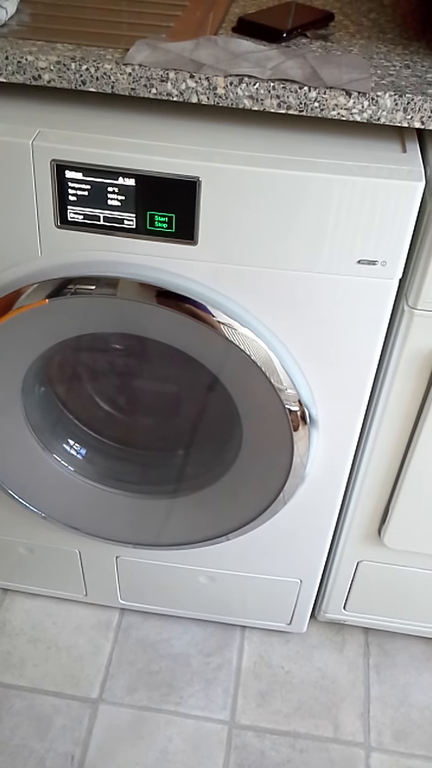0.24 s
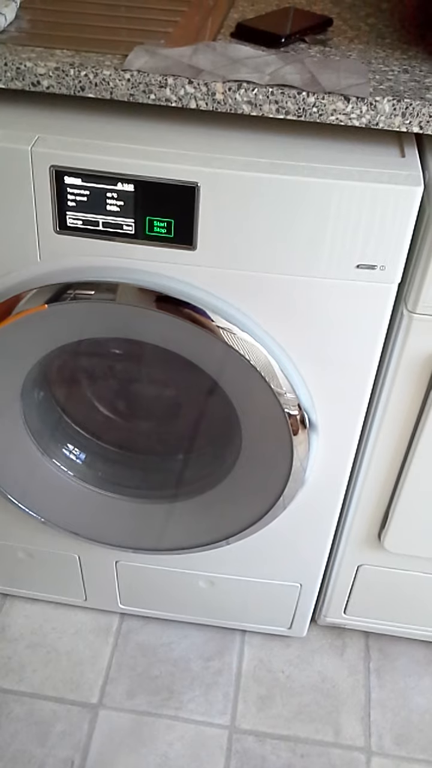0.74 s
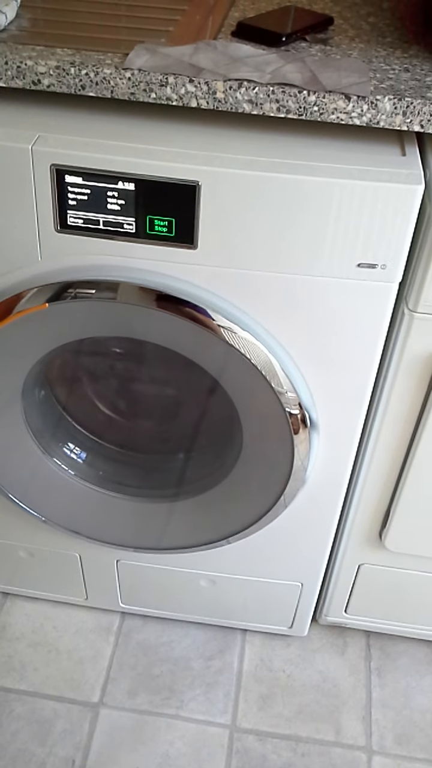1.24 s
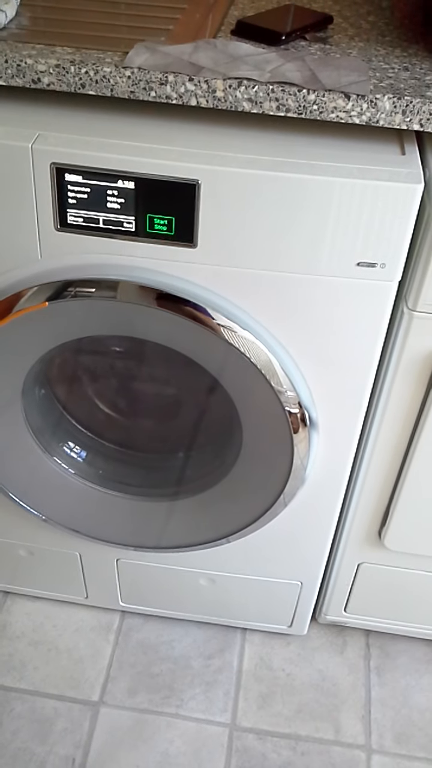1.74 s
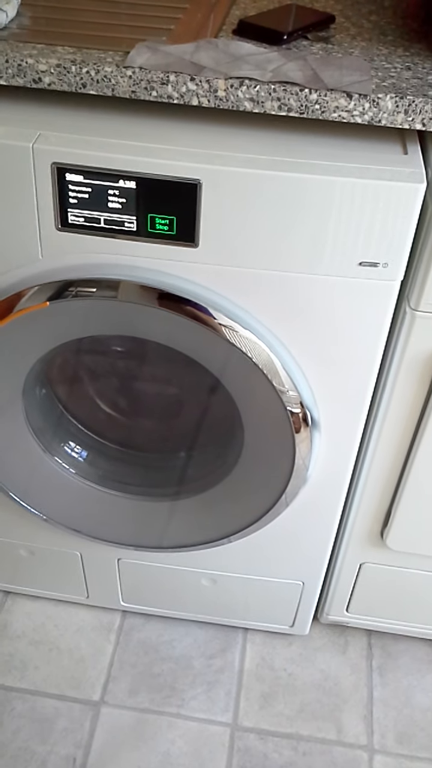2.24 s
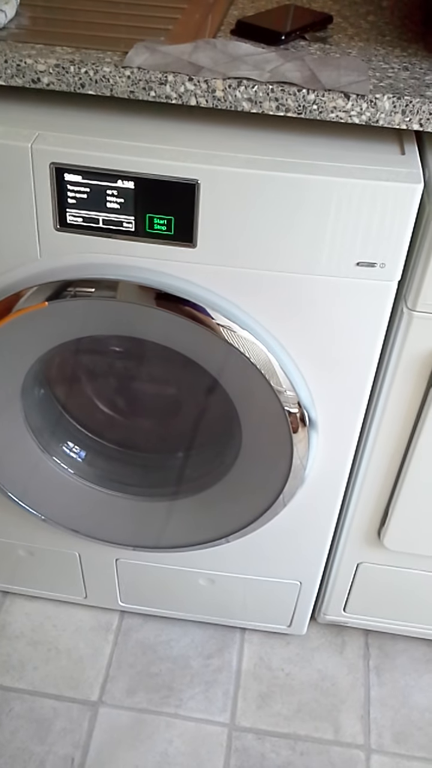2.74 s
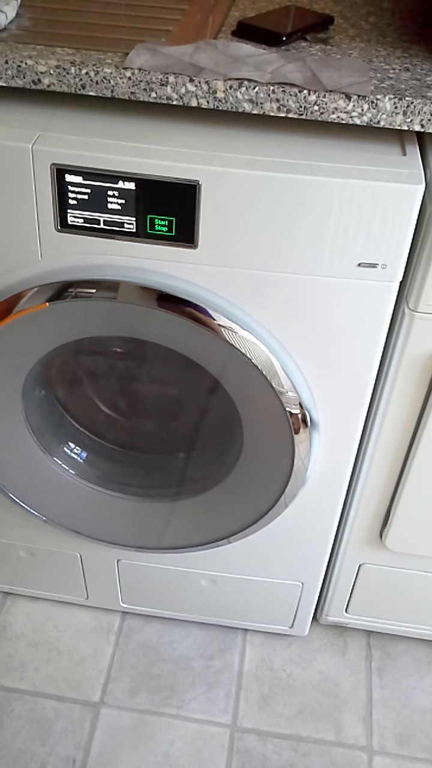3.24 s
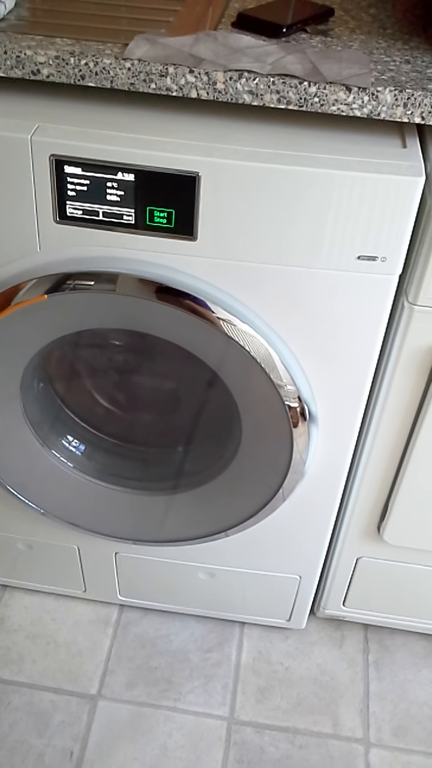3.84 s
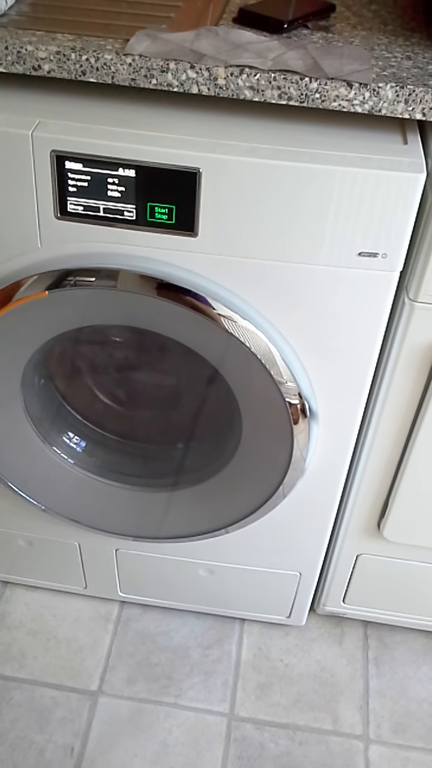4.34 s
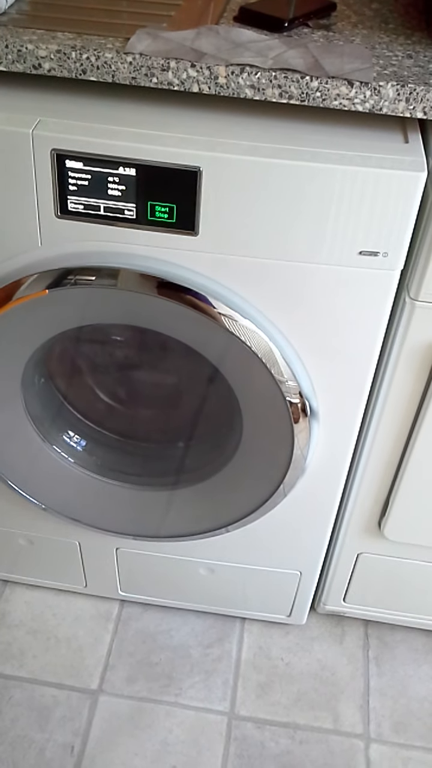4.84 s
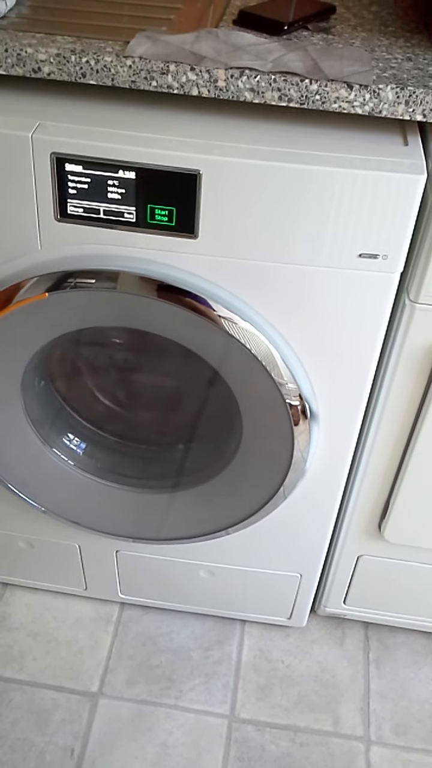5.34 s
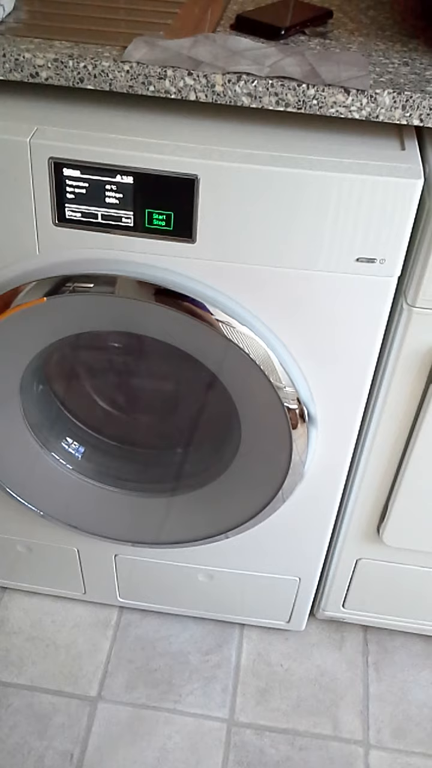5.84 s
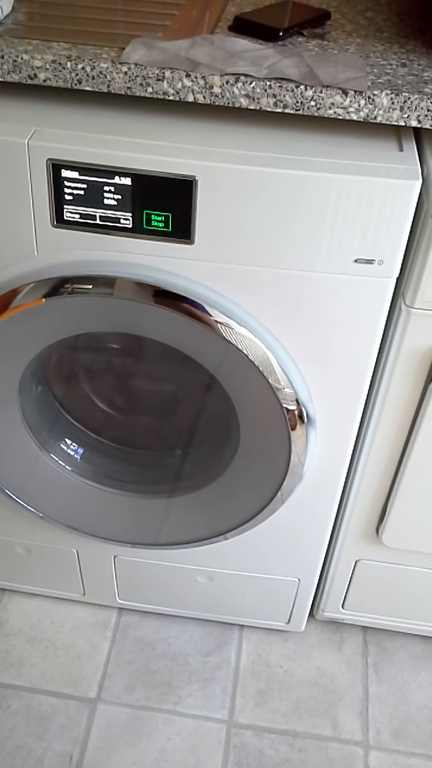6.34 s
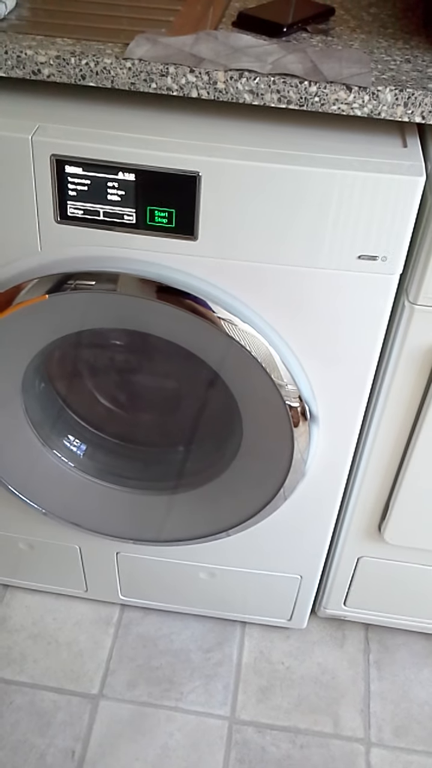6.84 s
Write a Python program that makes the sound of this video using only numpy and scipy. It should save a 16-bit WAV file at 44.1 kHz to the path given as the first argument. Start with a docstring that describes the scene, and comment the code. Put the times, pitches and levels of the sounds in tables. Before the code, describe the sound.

Continuous loud mechanical clatter from a spinning front-loader, picked up close by a single phone microphone in a small reflective kitchen. Very fast metal ticks and dead knocks fuse into a buzzing, piercing whine, gently swelling about three times a second as the tub rocks. Below are a buzzing drum hum, wavering motor tones, uneven low panel booms and steady airy hiss. It neither starts nor stops.

```python
"""A fast metallic knocking that blurs into a whine: a front-loading washing machine at full spin in a tiled kitchen.
A loose part knocks several times every drum turn; decaying sines and shaped noise let the cabinet and room ring on
from tick to tick. Under it the unbalanced drum hums in sines at multiples of its rate, with wandering motor tones.
Filtered noise makes the floor rumble, an uneven panel boom and the rushing air; one phone microphone hears it all."""
import sys
import numpy as np
from scipy import signal
from scipy.fft import rfft, irfft, next_fast_len
from scipy.io import wavfile
from scipy.ndimage import uniform_filter1d, minimum_filter1d, map_coordinates

SR = 44100
rng = np.random.default_rng(int(sys.argv[2]) if len(sys.argv) > 2 else 0)


def waveform_to_disk(signal):
    """Save audio, clipped to [-1, 1], as 16-bit WAV at the path in sys.argv[1]."""
    frames = np.transpose(np.atleast_2d(signal))
    scaled = np.clip(frames, -1, 1) * 32767
    samples = np.round(scaled).astype(np.int16)
    wavfile.write(sys.argv[1], SR, samples)


N = 313110

DRUM_HZ = 26.915  # turns a second
ROCK_HZ = 3.165  # the tub rocks on its springs

# Dense ringing of panels and walls, also the colour of the clicks: pitch_hz, relative level_db per Hz
PANEL_COLOUR = [(500, -37), (1200, -24), (1450, -22), (1750, -13), (2050, -1.5), (2600, -14.5),
                (3250, -6.5), (3410, -14), (3600, -5), (3830, -6.5), (4200, 0), (4900, -8), (5400, -4.5),
                (5800, -12), (6200, -8), (6800, -17.5), (7400, -12), (7900, -20), (8400, -15),
                (9400, -17.5), (10200, -30), (11500, -18.5), (12200, -39), (14000, -64)]


def amp(db):
    """Gain of a level in dB."""
    return 10 ** (np.asarray(db) / 20)


def unit(x):
    """x at rms 1."""
    return x / np.sqrt(np.mean(x ** 2) + 1e-20)


def along(points, hz):
    """Reads a curve of (Hz, value) points on a log frequency axis."""
    f, v = np.transpose(points)
    return np.interp(np.log(hz + 1), np.log(f + 1), v)


def wobble(rate):
    """A smooth random curve, rate knots a second."""
    knots = rng.standard_normal(int(N * rate / SR) + 4)
    return map_coordinates(knots, [np.arange(N) * rate / SR])


def filtered(x, response):
    """x shaped by a gain that depends on frequency."""
    m = next_fast_len(len(x) + SR // 2)
    return irfft(rfft(x, m) * response(np.fft.rfftfreq(m, 1 / SR)), m)[:len(x)]


def noise(spectrum):
    """Coloured noise of rms 1."""
    return unit(filtered(rng.standard_normal(N), lambda hz: amp(along(spectrum, hz))))


def sway(t):
    """Seconds by which the rocking tub, and its slower second motion, delay the drum's round."""
    rock_us, rock_start_s = 151, .0897  # peak lateness; a rising zero
    roll_hz, roll_us, roll_start_s = 2.11, 51, .0839
    rock = rock_us * np.sin(2 * np.pi * ROCK_HZ * (t - rock_start_s))
    roll = roll_us * np.sin(2 * np.pi * roll_hz * (t - roll_start_s))
    return 1e-6 * (rock + roll)


def ticks(lead):
    """One blow per turn, placed between samples; starts early, so the ringing is already full."""
    first_tick_s = .0082
    drift_us, scatter_us = 39, 34  # slow irregular lateness; random lateness of each tick
    size_scatter_db, rock_swell_db = .5, .25  # blows differ at random and with the rocking
    t = first_tick_s + np.arange(-12, int(N / SR * DRUM_HZ)) / DRUM_HZ
    chance = rng.standard_normal((len(t), 2))
    drift = np.interp(t, np.arange(N) / SR, wobble(14))
    late_us = drift_us * drift + scatter_us * chance[:, 0]
    at = (t + sway(t) + 1e-6 * late_us) * SR + lead
    rocking = np.sin(2 * np.pi * (ROCK_HZ * t + 0.5))
    size = amp(size_scatter_db * chance[:, 1] + rock_swell_db * rocking)
    # a windowed sinc carries each blow to its exact fraction of a sample
    index = np.round(at).astype(int)[:, None] + np.arange(-16, 17)
    off = index - at[:, None]
    pulse = size[:, None] * np.sinc(off) * np.cos(np.pi * off / 34) ** 2
    return np.bincount(index.ravel(), pulse.ravel(), N + lead + 64)[:N + lead]


def chatter(t):
    """The struck part chatters: bright noise clicks of the blow and its rebounds, each dying fast."""
    # Rebounds: start_s after the blow, relative level_db
    rebounds = [(0, -30), (.0025, -37), (.0105, -49), (0.0157, -19), (.0205, -40), (.0285, -42)]
    click_t60_s, click_above_hz = 0.0063, 5500
    shape = sum(amp(db - 60 * np.maximum(t - s, 0) / click_t60_s) * (t >= s) for s, db in rebounds)

    def colour(hz):
        tilt = amp(along(PANEL_COLOUR, hz) - along(PANEL_COLOUR, 6200))
        return tilt / (1 + (click_above_hz / (hz + 1)) ** 8)

    return filtered(shape * rng.standard_normal(len(t)), colour)


def cabinet_modes(t):
    """Strong modes of the steel cabinet: decaying sines, each rung by one of the contacts in a turn."""
    # Modes: pitch_hz, relative level_db, t60_s, contact (number from 0)
    modes = [(946.5, -41.5, 0.18, 0), (975.5, -45.5, 0.31, 0), (1004.3, -40.5, 0.16, 0),
             (1050, -34, 0.19, 0), (1078.5, -42.5, 0.28, 0), (1130, -40.5, 0.24, 0), (1158, -42, 0.35, 0),
             (1192, -42, 0.34, 1), (1265, -52, 0.12, 0), (1394.5, -44, .75, 0), (1415.6, -45, 0.4, 1),
             (1607, -40.5, 0.29, 2), (1619, -46, 0.32, 2), (1700, -50, 0.27, 0), (1723, -43, 0.31, 0),
             (1743, -44, 0.16, 0), (1805, -43, 0.24, 1), (1860, -42, 0.2, 0), (1886, -30.5, 0.17, 0),
             (1916, -32, 0.16, 0), (1938, -31, 0.14, 0), (1958, -35.5, 0.15, 0), (2045, -35.5, 0.34, 1),
             (2100, -34, 0.13, 2), (2116, -35.5, 0.24, 0), (2176, -29.5, 0.26, 1), (2261, -25.5, 0.17, 2),
             (2296, -34.5, 0.27, 0), (2330, -56, 0.17, 1), (2400, -36, 0.18, 1), (2420, -41, 0.11, 1),
             (2733, -37.5, 0.17, 0), (2795, -32, 0.24, 0), (2850, -37, 0.22, 0), (2910, -26, 0.15, 0),
             (3030, -35, 0.12, 2), (3110, -32.5, 0.18, 2), (3332, -27.5, 0.29, 1), (3568, -33, 0.14, 0),
             (2931, -31, 0.18, 0), (3142, -33.5, 0.19, 2), (3218, -28.5, 0.25, 1), (3284, -31, 0.24, 0),
             (3367, -23, 0.11, 0), (3490, -30.5, 0.27, 0), (3528, -30.5, 0.34, 0), (3573, -36, 0.34, 0),
             (3655, -32, 0.42, 0), (3650, -40, 0.26, 1), (3734, -30.5, .22, 1), (3920, -33.5, 0.34, 1),
             (3950, -34, 0.28, 2), (4047, -29, 0.13, 2), (4073, -31, .3, 0), (4110, -36, .25, 2),
             (4144, -25, .3, 2), (4133, -22.5, .28, 1), (4153, -23.5, .28, 1), (4188, -35, .28, 0),
             (4215, -27.5, .28, 2), (4294, -28, .28, 1), (4355, -33, .28, 2), (4380, -29.5, .28, 0),
             (4402, -31, .28, 1), (4432, -30, .28, 2), (4510, -35, 0.22, 2), (4700, -47, 0.18, 1),
             (4550, -33, 0.17, 2), (4630, -49, .2, 2), (4712, -30, 0.1, 1), (4805, -27, 0.13, 1),
             (5190, -41, .2, 0), (5175, -37, 0.33, 1), (5275, -42, 0.47, 0), (5378, -31.5, 0.24, 0),
             (5437, -33, 0.23, 0), (5490, -38, 0.2, 1), (5270, -42, .28, 2), (5620, -28, 0.077, 0),
             (6149, -39, 0.11, 0), (6305, -31.5, 0.063, 0), (7270, -27.5, 0.09, 0)]
    # Contacts in a turn: start_s after the first
    contacts = [0, .0135, .0285]
    attack_s = 0.0041
    since = [np.maximum(t - s, 0) for s in contacts]

    def ring(u, hz, db, t60):
        build_up = 1 - np.exp(-u / attack_s)
        return amp(db - 60 * u / t60) * np.sin(2 * np.pi * hz * u) * build_up

    return sum(ring(since[round(k)], hz, db, t60) for hz, db, t60, k in modes)


def panel_wash(t):
    """Dense ringing of panels and room: noise that dies by band, evened out and coloured."""
    # Decay of the wash: pitch_hz, t60_s
    wash_t60 = [(700, 0.33), (2000, 0.81), (4000, 0.97), (8000, 0.11)]
    even_hz = 70  # so dense that no band this wide stands out by chance
    hz, frames, z = signal.stft(rng.standard_normal(len(t)), SR, nperseg=256)
    late = np.maximum(frames - .025, 0)  # the panels feed the room for a while before the decay sets in
    z = z * amp(-60 * late / along(wash_t60, hz)[:, None])
    dying = rfft(signal.istft(z, SR, nperseg=256)[1][:len(t)])
    local = uniform_filter1d(np.abs(dying) ** 2, round(even_hz * len(t) / SR))
    even = dying / np.sqrt(np.abs(local) + 1e-20)
    colour = amp(along(PANEL_COLOUR, np.fft.rfftfreq(len(t), 1 / SR)))
    return irfft(even * colour, len(t))


def ringing():
    """What one turn sets off: cabinet modes in a dense wash that builds up and dies, plus bright clicks."""
    t = np.arange(SR // 2) / SR
    fade = np.clip((t[-1] - t) / .05, 0, 1)
    modes = cabinet_modes(t) * fade
    wash = amp(-34.5) * unit(panel_wash(t) * fade) * (1 - np.exp(-t / 0.0042))
    return modes + wash + chatter(t)


def knocks(train, lead):
    """Short dead knocks inside each turn: rising, quickly damped sines that swell at the tub's rocking rate."""
    # Knocks: start_s after the first contact, pitch_hz at onset, relative level_db, t60_s,
    # swell_db, moment of the swell (share of one rock)
    thuds = [(.0005, 2100, -15.5, .022, 1.5, .5), (.0005, 4630, -15, 0.024, 4, 0.23),
             (.0002, 5405, -16.5, .03, 1.5, 0.96), (.0003, 8150, -24, .03, 2.5, .8),
             (.0003, 7500, -25.5, 0.026, 0.5, .8), (.002, 1112, -26, 0.032, 1, .94),
             (.002, 3574, -16, 0.025, 3, 0.28), (.0028, 6184, -21.5, 0.024, -0.5, 0.73),
             (.006, 3050, -18, 0.024, 4.5, .3), (.0085, 4595, -17.5, 0.027, 4.5, .3),
             (.009, 3630, -14, 0.023, 4, 0.35), (.009, 6170, -22, 0.04, 0.5, .8),
             (0.0136, 4143, -14, 0.081, 2, 0.82), (.017, 1954, -15.5, .025, 2, 0.65),
             (.0175, 4280, -20, .03, 1, 1), (.017, 2985, -18, 0.037, 1.5, .3),
             (0.0176, 7600, -25, 0.022, 1.5, .8), (.022, 5400, -16, .022, 1, .9),
             (0.0303, 4150, -13, 0.04, 2.5, .8), (0.0297, 6030, -25, 0.028, 3, .8)]
    attack_s, rise = 0.0015, 0.95  # build-up; pitch climbs by twice this share a second
    uneven_db, own_db = 1.1, 2  # harder or softer together, and each on its own
    t, u = np.arange(N) / SR, np.arange(SR // 10) / SR
    total = np.zeros(N)
    for s, hz, db, t60, swell_db, moment in thuds:
        v = np.maximum(u - s, 0)
        envelope = amp(db - 60 * v / t60) * (1 - np.exp(-v / attack_s))
        thud = envelope * np.sin(2 * np.pi * hz * v * (1 + rise * v))
        rocking = np.cos(2 * np.pi * (ROCK_HZ * t - moment))
        weight_db = swell_db * rocking + own_db * wobble(20)
        total += amp(weight_db) * signal.oaconvolve(train, thud)[lead:lead + N]
    return amp(uneven_db * wobble(16)) * total


def rattle():
    """Every blow of the loose part sets off the ringing of cabinet and kitchen, and the dead knocks."""
    lead = SR // 2
    train = ticks(lead)
    ring = signal.fftconvolve(train, ringing())[lead:lead + N]
    return amp(2.5) * ring + knocks(train, lead)


def hum():
    """The unbalanced drum's orders: sines that follow the rocking, each swelling a little on its own."""
    # Drum orders: multiple of the drum rate, relative level_db
    orders = [(1, -11), (2, -27), (3, -11), (4, -6), (5, -5.5), (6, -5.5), (7, -10.5), (8, -13), (9, 0),
              (10, -20), (11, -13), (12, -12), (13, -19), (14, -7.5), (15, -12), (16, -19), (17, -24),
              (18, -20), (19, -24), (20, -11), (21, -23), (22, -12), (23, -37), (24, -29), (25, -13),
              (26, -13), (27, -9), (28, -16.5), (29, -9.5), (30, -13.5), (31, -15.5), (32, -33), (33, -24),
              (34, -17), (37, -25)]
    t = np.arange(N) / SR
    angle = DRUM_HZ * (t - sway(t))  # turns
    return sum(amp(db - 36 + 1.2 * wobble(3.135)) * np.sin(2 * np.pi * (k * angle + rng.random()))
               for k, db in orders)


def motor():
    """Tones that do not lock to the drum and waver in pitch and level."""
    # Wavering tones: pitch_hz, level_db (rms, before wavering), wander_hz
    tones = [(291.4, -44, 1.2), (325.2, -44, 1.49), (406, -50.5, 3.79), (436, -50.5, 2.95),
             (474, -56, 2.94), (576, -53.5, 2.11)]

    def tone(hz, wander):
        turns = np.cumsum(hz + wander * wobble(6)) / SR
        return np.sqrt(2) * np.sin(2 * np.pi * turns)

    return sum(amp(db + 2.3 * wobble(5.5)) * tone(hz, wander) for hz, db, wander in tones)


def rumble():
    """Shaking passed to the floor: low coloured noise of uneven level."""
    # Floor noise: pitch_hz, relative level_db per Hz
    floor_colour = [(20, -16), (60, -11), (100, -1.5), (145, -1.5), (200, 3), (262, -3), (330, -1),
                    (450, -5.5), (600, -6.5), (1000, -9), (1600, -45)]
    return amp(-35.0 + 1.1 * wobble(4.9)) * noise(floor_colour)


def boom():
    """A low panel booms unevenly: resonant noise, with short sine bursts where it swells."""
    # Strongest swells: centre_s, level_db (rms, at the centre)
    bursts = [(0.3, -34), (0.73, -36), (1.34, -33), (2.13, -32), (3.61, -30.5), (4.09, -31), (4.78, -38),
              (5.5, -28), (5.92, -34), (6.43, -31), (6.97, -35)]
    panel_hz, panel_width_hz = 214.8, 16
    boom_db, uneven_db = -45.5, 4.5
    swell_s = 0.023  # half length of a swell
    t = np.arange(N) / SR

    def resonance(hz):
        return 1 / (1 + ((hz - panel_hz) / panel_width_hz) ** 2)

    panel = unit(filtered(rng.standard_normal(N), resonance))
    swells = np.zeros(N)
    for s, db in bursts:
        pitch, turn = rng.random(2)
        hz = panel_hz + panel_width_hz * (pitch - .5)
        envelope = np.sqrt(2) * amp(db) * np.exp(-((t - s) / swell_s) ** 2 / 2)
        swells += envelope * np.sin(2 * np.pi * (hz * t + turn))
    return amp(boom_db + uneven_db * wobble(9)) * panel + swells


def air():
    """Air dragged round by the drum: coloured noise, almost steady."""
    # Rushing air: pitch_hz, relative level_db per Hz
    air_colour = [(710, -25.5), (1200, -9), (1520, -17), (2220, -6), (2560, -16), (3000, -1), (3830, -6),
                  (4260, -9.5), (4920, -17), (7900, -12.5), (8540, -11), (9750, -82), (10200, -50),
                  (11800, -40), (13800, -98)]
    return amp(-27.5 + 0.2 * wobble(2.8)) * noise(air_colour)


def scene():
    """All sources at the single microphone, the same on both channels."""
    return np.tile(rattle() + hum() + motor() + rumble() + boom() + air(), (2, 1))


def record(dry):
    """Peaks are held down by a limiter, and nothing above top_hz is kept."""
    ceiling, limit_s = .71, .004  # amplitude; time that sets the look-ahead and release
    top_hz = 13954
    span = round(limit_s * SR)
    need = np.minimum(1, ceiling / (np.abs(dry).max(axis=0) + 1e-9))
    gain = uniform_filter1d(minimum_filter1d(need, 2 * span), span)
    return np.array([filtered(side * gain, lambda hz: hz < top_hz) for side in dry])


dry = scene()
out = record(dry)
waveform_to_disk(out)
```